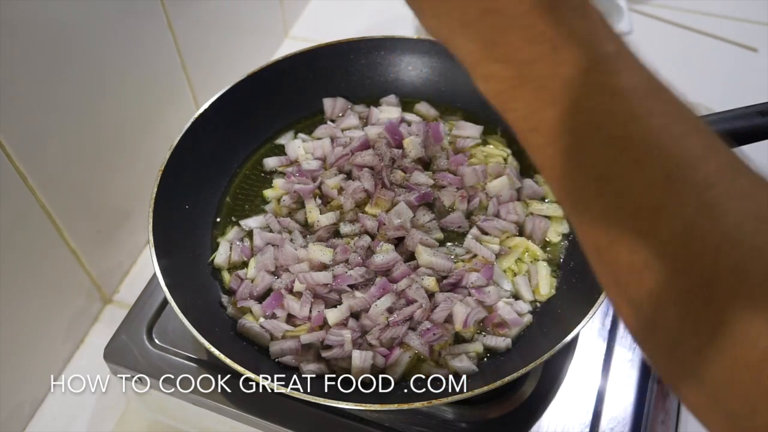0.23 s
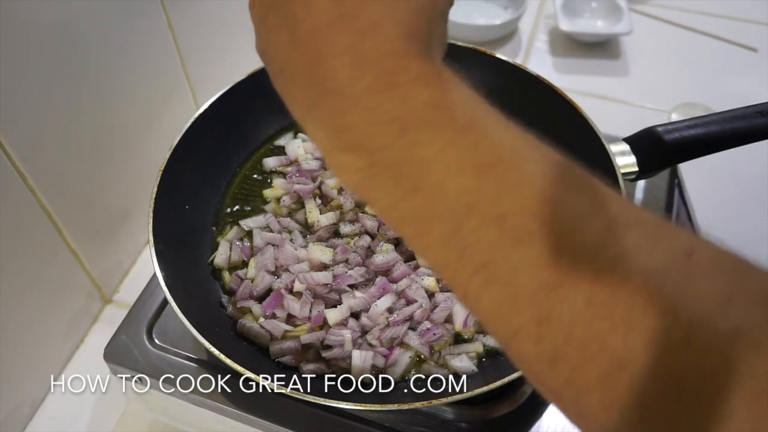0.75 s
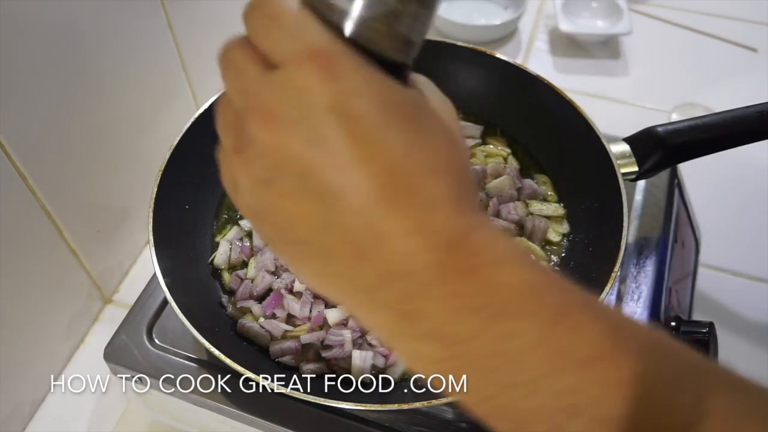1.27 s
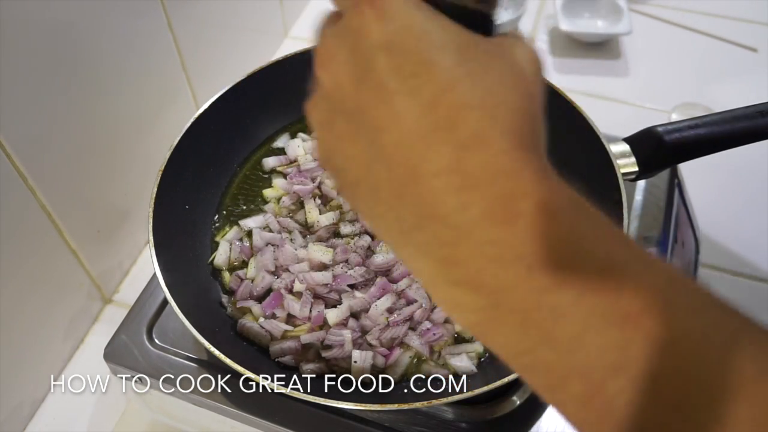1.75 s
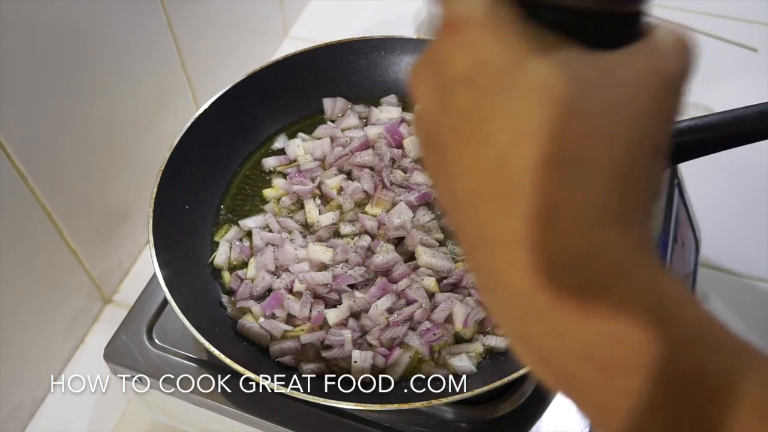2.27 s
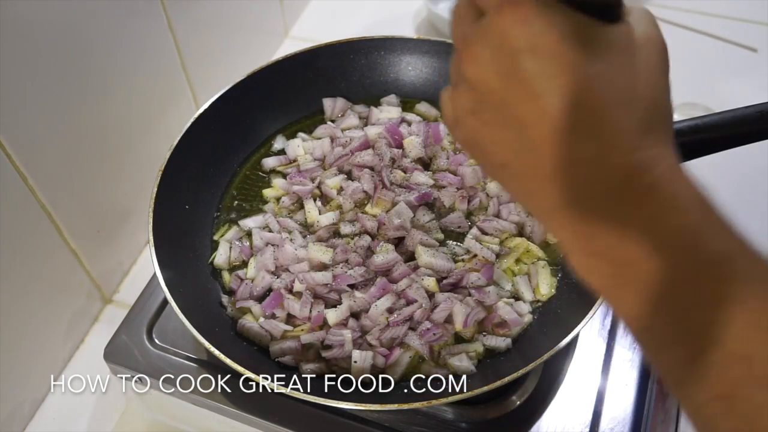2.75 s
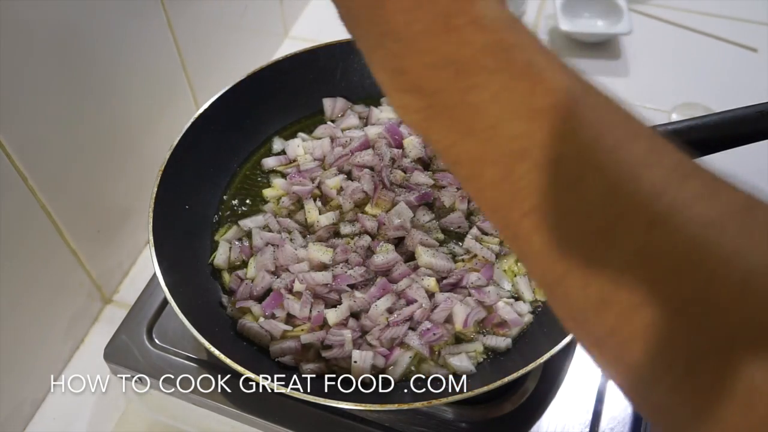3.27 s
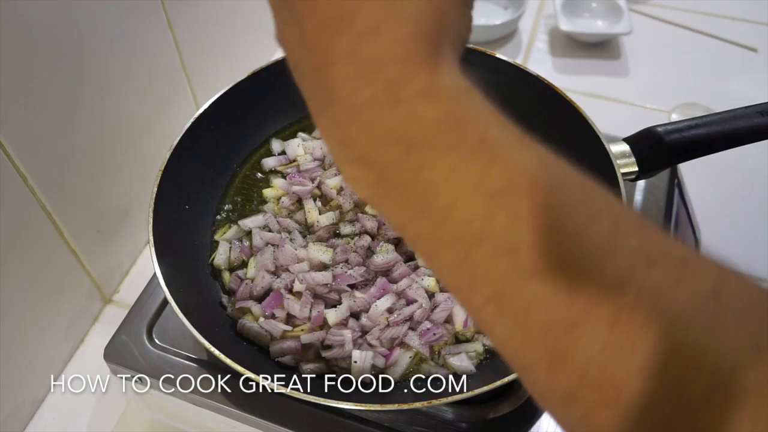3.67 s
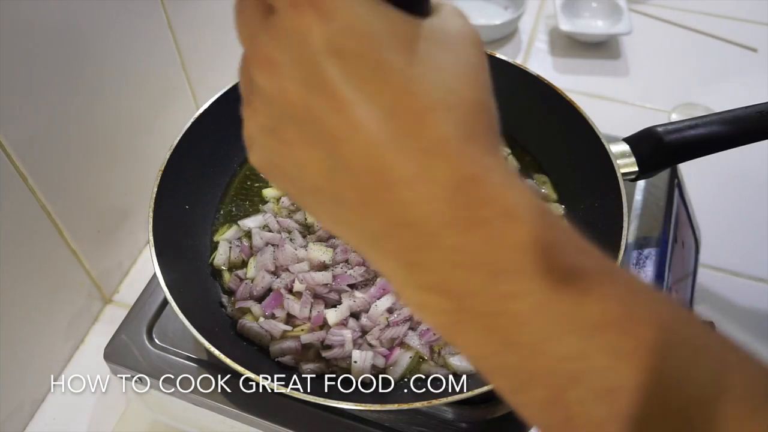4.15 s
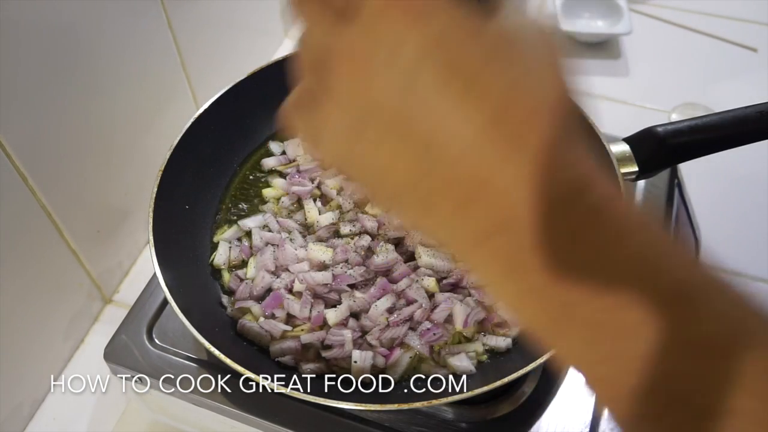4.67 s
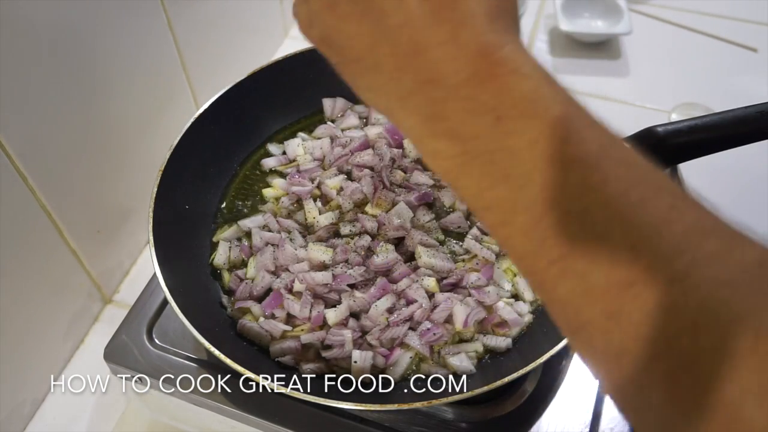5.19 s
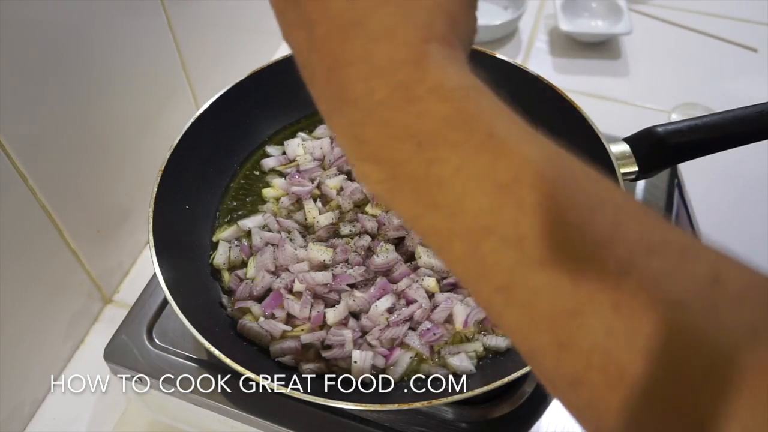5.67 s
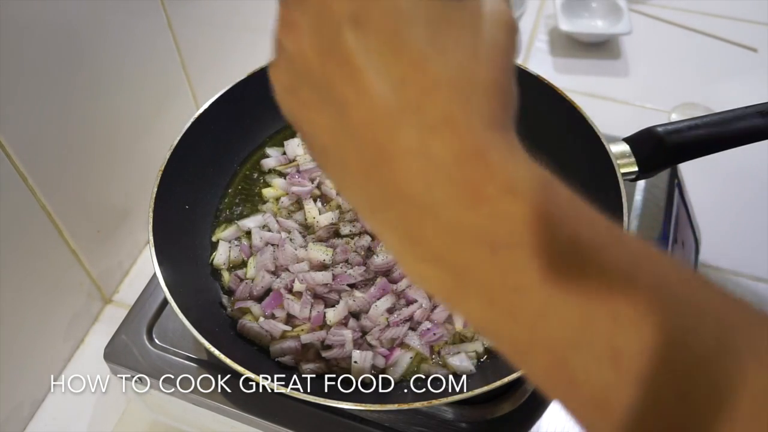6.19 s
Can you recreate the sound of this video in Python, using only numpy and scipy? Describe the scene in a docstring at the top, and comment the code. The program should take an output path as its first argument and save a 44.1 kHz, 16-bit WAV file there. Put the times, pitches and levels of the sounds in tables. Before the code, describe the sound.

Rhythmic hand grinding of peppercorns, heard close in stereo and slightly left, with a very short hard-room echo. Rough crackling crunches alternate with brief gaps filled by sandy trickling; single corns pop sharply on top. A few muffled thumps of hand on mill, a quiet hiss of frying oil, and deep steady room rumble lie below. A loose, rattly, lighter passage interrupts the pattern late, before stronger grinding returns.

```python
"""In a tiled kitchen, a hand pepper mill is twisted three to four times a second above a pan of frying onions.
Each twist crushes corns between the burrs: clumped impulses and noise ring the modes of the mill's body.
Single corns snap, and loose corns and grounds rustle brightly as bunched ticks of noise.
The hand knocks softly on the mill, the oil fizzes underneath, and a rumble and low hum fill the room."""
import sys
import numpy as np
from scipy import signal
from scipy.fft import rfft, irfft, next_fast_len
from scipy.io import wavfile
from scipy.ndimage import uniform_filter1d

SR = 44100
rng = np.random.default_rng(int(sys.argv[2]) if len(sys.argv) > 2 else 0)


def generate_wav(sig):
    """Save sig (samples, or channels by samples) to the path in sys.argv[1] as 16-bit PCM at SR."""
    pcm = np.round(np.clip(np.atleast_2d(sig).T, -1, 1) * 32767).astype(np.int16)
    wavfile.write(sys.argv[1], SR, pcm)


N = 283563  # length in samples, about 6.43 s
CONTROL_STEP = 64  # samples between the points of a surge's gain curve


def gain_of(db):
    """Turns decibels into an amplitude factor."""
    return 10 ** (np.asarray(db) / 20)


def evened(x):
    """Scales a sound to rms 1."""
    return x / np.sqrt(np.mean(x ** 2) + 1e-20)


def read(points, hz):
    """Reads a frequency table, interpolating along log frequency."""
    f, value = np.transpose(points)
    return np.interp(np.log(hz + 1), np.log(f + 1), value)


def curve(rows):
    """Draws straight lines between timed points, one value a sample."""
    s, value = np.transpose(rows)
    return np.interp(np.arange(N) / SR, s, value)


def add(mix, start_s, sound):
    """Lays a sound into the mix, cut off at the end."""
    part = mix[..., round(start_s * SR):][..., :sound.shape[-1]]
    part += sound[..., :part.shape[-1]]


def drift(shape, size):
    """Slow random wander of rms 1: noise averaged twice over size samples."""
    once = uniform_filter1d(rng.standard_normal(shape), size)
    return evened(uniform_filter1d(once, size))


def clicks(length, per_s, spread_db):
    """Random impulses of either sign; a few are large."""
    size = gain_of(spread_db * np.minimum(rng.exponential(1, length), 3))
    sign = rng.choice([-1., 1.], length)
    happens = rng.random(length) < per_s / SR
    return evened(size * sign * happens)


def coloured(x, points):
    """Filters x by a spectrum table and scales it to rms 1."""
    size = next_fast_len(N)
    hz = np.fft.rfftfreq(size, 1 / SR)
    return evened(irfft(rfft(x, size) * gain_of(read(points, hz)))[..., :N])


def swing(x, hz, width):
    """One damped mode as a turning complex pointer; its real part has about gain 1 at the centre."""
    r = np.exp(-np.pi * width / SR)
    return 2 * signal.lfilter([1 - r], [1, -r * np.exp(2j * np.pi * hz / SR)], x)


def ring(x, hz, width):
    """The audible part of one damped mode."""
    return swing(x, hz, width).real


def surges(rows, rise_db, sag_db_per_s, let_go_db, release_db_per_s, let_go_s=0.027):
    """Each row swells, sags while it holds, drops quickly and dies away; one gain curve a row."""
    start, rise, hold, level_db = np.transpose(rows)[:4, :, None]
    t = np.arange(0, N, CONTROL_STEP) / SR - start
    after = np.maximum(t - rise - hold, 0)
    swell = rise_db * np.minimum(t / rise - 1, 0)
    sag = sag_db_per_s * np.clip(t - rise, 0, hold)
    let_go = let_go_db * np.minimum(after / let_go_s, 1)
    release = release_db_per_s * after
    return gain_of(level_db + swell - sag - let_go - release) * (t >= 0)


def total(gains):
    """Power sum of the surges, brought up to the sample rate."""
    summed = np.sqrt((gains ** 2).sum(0))
    return np.interp(np.arange(N) / CONTROL_STEP, np.arange(gains.shape[1]), summed)


# stereo image, from apart (0) to identical (1): freq_hz, likeness [ratio]
LIKENESS = [(60, 1), (180, 0.98), (550, 0.88), (1650, 0.62), (4970, 0.17), (9000, 0.17), (15000, 0.41)]


def spread(a, b):
    """Makes left and right from two sounds, most alike in the bass and wider in the treble."""
    size = next_fast_len(N)
    same = np.clip(read(LIKENESS, np.fft.rfftfreq(size, 1 / SR)), 0, 1)
    mid = np.sqrt((1 + same) / 2) * rfft(a, size)
    side = np.sqrt((1 - same) / 2) * rfft(b, size)
    return irfft([mid + side, mid - side], size)[:, :N]


# spectrum of the room's rumble, relative: freq_hz, density_db [dB per Hz]
RUMBLE_SPECTRUM = [(20, -8), (45, -3.5), (200, -7), (260, -12.5), (500, -11.5), (900, -13.5)]
# lines of the hum, relative: pitch_hz, width_hz, level_db
HUM_LINES = [(30.8, 2.4, -11), (62.3, 8.6, -10.5), (107.5, 2.9, -11), (190, 16, -12)]
# shared ride of the room and the fizz before trims, with dips: time_s, level_db
ROOM_LEVEL = [(0, -39.5), (1.6, -40.5), (1.72, -47.5), (2.3, -40.5), (4.78, -35.5), (4.86, -50.5),
              (5.15, -54), (5.33, -54), (5.4, -47.5), (5.9, -44), (6.43, -45)]


def room_rumble_and_hum():
    """Low coloured noise with a wavering hum: noise rung through narrow modes."""
    rumble = spread(*(coloured(rng.standard_normal(N), RUMBLE_SPECTRUM) for _ in range(2)))
    hum = np.zeros(N)
    for hz, width, db in HUM_LINES:
        wavering = ring(ring(rng.standard_normal(N), hz, width), hz, 3 * width)
        hum += gain_of(db) * evened(wavering)
    # the strongest line has a steady core
    hum += np.sin(2 * np.pi * HUM_LINES[1][0] * np.arange(N) / SR)
    return gain_of(curve(ROOM_LEVEL) - 1.5) * (rumble + 0.3 * hum)


# spectrum of the frying oil, relative: freq_hz, density_db [dB per Hz]
FIZZ_SPECTRUM = [(290, -17.5), (500, -22), (1210, -5.5), (1460, -9), (1670, -3.5), (9360, -1.5),
                 (13800, -0.5), (16000, -3.5)]


def oil_fizz():
    """Oil hiss roughened by small pops; it sinks less than the hum."""
    pops = signal.lfilter([1], [1, -.9], abs(clicks(N, per_s=600, spread_db=5.0)))
    roughness = 0.39 * evened(pops) + 1
    fizz = spread(*(coloured(roughness * rng.standard_normal(N), FIZZ_SPECTRUM) for _ in range(2)))
    return gain_of(0.44 * curve(ROOM_LEVEL) - 12.5) * fizz


# decay of the kitchen's echo: freq_hz, t60_s
ECHO_DECAY = [(500, 0.15), (2000, 0.13), (8000, 0.074)]


def kitchen(x):
    """Echo of the kitchen: sparse taps of random sign, each band dying at its own speed."""
    length, gap = SR // 2, 20
    taps = np.zeros((2, length))
    # one tap at a random place in every gap
    at = np.arange(150, length - gap, gap) + rng.integers(0, gap, (2, (length - 151) // gap))
    np.put_along_axis(taps, at, rng.choice([-1., 1.], at.shape), 1)
    hz, t, bands = signal.stft(taps, SR, nperseg=256)
    decay = gain_of(-60 * t / read(ECHO_DECAY, hz)[:, None])
    tail = signal.istft(bands * decay, SR, nperseg=256)[1]
    return signal.fftconvolve(x, tail / np.linalg.norm(tail[0]), axes=1)[:, :N]


# soft knocks of the hand on the mill: start_s, level_db, pitch_hz, t60_s
HAND_KNOCKS = [(1.127, -38, 260, 0.077), (1.155, -32.5, 184, 0.094), (1.235, -33.5, 169, .07),
               (1.327, -39, 324, 0.13), (1.489, -34.5, 190, 0.056), (1.586, -29.5, 173, 0.057),
               (1.958, -33.5, 184, 0.077), (2.247, -39, 124, .07), (5.75, -39.5, 218, 0.031),
               (5.951, -21, 343, 0.012)]


def knocks():
    """Dull thumps: one low damped mode and a short puff of noise around 340 Hz."""
    out, t = np.zeros(N), np.arange(4000) / SR
    for start_s, db, hz, t60 in HAND_KNOCKS:
        noise = rng.standard_normal(len(t))
        puff = evened(ring(ring(noise, 340, 230), 340, 230)) * gain_of(-35 * t / t60)
        mode = np.sin(2 * np.pi * hz * t) * gain_of(-60 * t / t60)
        onset = np.minimum(t / 0.0033, 1)
        add(out, start_s, gain_of(db) * (mode + 0.47 * puff) * onset)
    return out


# grain of the rustle, relative: freq_hz, density_db [dB per Hz]
GRIT_SPECTRUM = [(530, -42), (1000, -22), (1500, -22), (2020, -9), (5000, -4), (8550, -2), (13000, -4.5),
                 (15800, -11)]
# bursts as corns slide and grounds fall: start_s, rise_s, hold_s, level_db
SLIDE_BURSTS = [(0.135, 0.039, 0.034, -19), (0.232, .02, 0.066, -25), (0.474, 0.0029, 0.16, -21),
                (0.65, 0.019, 0.36, -24.5), (0.937, 0.004, 0.033, -24.5), (1.07, 0.023, 0.023, -33),
                (1.15, 0.024, 0.006, -20.5), (1.235, 0.017, 0.11, -21.5), (1.585, 0.018, 0.077, -21),
                (1.74, 0.039, 0.033, -19), (1.975, 0.031, 0.041, -21.5), (2.12, 0.0079, 0.052, -22),
                (2.27, 0.03, 0.027, -21.5), (2.396, 0.012, 0.14, -23), (2.57, 0.016, 0.028, -25.5),
                (2.668, 0.018, 0.16, -24), (3.04, 0.024, 0.056, -23.5), (3.27, 0.07, 0.081, -27.5),
                (3.44, 0.0071, 0.098, -24), (3.77, 0.048, 0.082, -20), (4.07, 0.068, 0.099, -24),
                (4.505, 0.041, 0.062, -19), (4.75, 0.019, 0.017, -23), (4.795, 0.0078, 0.011, -15.5),
                (4.84, 0.012, 0.0099, -23), (4.88, 0.012, 0.013, -18), (4.94, 0.016, 0.043, -19.5),
                (5.035, 0.016, 0.017, -20), (5.1, 0.035, 0.041, -23.5), (5.26, 0.021, 0.025, -26),
                (5.46, 0.059, 0.0093, -20.5), (5.72, 0.023, 0.021, -27.5), (5.85, 0.012, 0.017, -27.5),
                (5.93, 0.016, 0.0076, -22.5), (5.995, 0.019, 0.023, -27.5), (6.24, 0.023, 0.069, -25)]
# steady rustle under the bursts: time_s, level_db
TRICKLE_LEVEL = [(0, -24), (.12, -44), (.35, -29), (1.45, -25.5), (1.9, -31), (3, -27), (3.65, -29),
                 (4.35, -30), (5.2, -28), (5.4, -46), (5.65, -31), (6.2, -60), (6.43, -24.5)]


def rustle():
    """Thousands of tiny dry ticks, bunched as the corns slide; small and large grains bunch apart."""
    out, tick = np.zeros((2, N)), np.hanning(40)
    # bunching shared by every band
    wide = signal.oaconvolve(abs(clicks(N, per_s=360, spread_db=0.5)), tick, "same")
    for band_hz in [(600, 4000), (4000, 7000), (7000, 11000), (11000, 21000)]:
        narrow = signal.oaconvolve(abs(clicks(N, per_s=140, spread_db=1.5)), tick, "same")
        ticks = 0.8 * evened(wide) + 0.35 * evened(narrow) + 1.3
        pair = [coloured(ticks * rng.standard_normal(N), GRIT_SPECTRUM) for _ in range(2)]
        band = signal.butter(2, band_hz, "band", fs=SR, output="sos")
        out += gain_of(2.17 * drift(N, size=500)) * signal.sosfilt(band, spread(*pair))
    bursts = total(surges(SLIDE_BURSTS, rise_db=12.5, sag_db_per_s=3.5, let_go_db=3.5, release_db_per_s=132))
    flicker = gain_of(0.64 * drift(N, size=300))
    return evened(out * flicker) * np.hypot(bursts, gain_of(curve(TRICKLE_LEVEL)))


# modes of the mill's body, relative, played by snaps and grinding: pitch_hz, width_hz, level_db
BODY_MODES = [(720, 110, -10.5), (852.7, 160, -2.5), (1091.6, 255, -13), (1422, 390, 1.5), (1614, 433, 5.5),
              (1910, 427, 4.5), (2162, 300, 5), (2710, 404, -1), (3760, 283, 7.5), (4970, 3080, -11)]
# single corns that snap, peaks before the high-pass: start_s, ring_db, pitch_hz [strongest], tick_db
CORN_SNAPS = [(0.234, -15, 2030, -12), (0.282, -10, 1820, -23), (0.29, -12, 2510, -11),
              (0.481, -28, 2460, -5), (0.613, -8.5, 2000, -22), (0.626, -10, 1950, -22),
              (0.691, -12, 2160, -9), (0.9405, -7, 3700, -15), (0.949, -17, 3900, -18),
              (1.1175, -35, 2560, -9), (1.1882, -12, 2530, -22), (1.325, -13, 2000, -11),
              (1.339, -9, 2000, -9), (1.596, -13, 3830, -20), (1.714, -9, 3670, -20),
              (1.8435, -20, 3630, -10), (1.9265, -25, 3570, -10), (2.0912, -11, 2280, -9.5),
              (2.2814, -33, 3640, -12), (2.341, -16, 2630, -10), (2.449, -7, 2830, -9),
              (2.506, -33, 2000, -12), (2.606, -19, 2700, -8), (2.6779, -23, 3300, -5),
              (2.7867, -11, 2680, -24), (2.82, -9, 2700, -21), (2.842, -11.5, 2660, -14),
              (2.875, -29, 3700, -9), (2.8807, -8.5, 2960, -28), (3.136, -16, 1510, -16),
              (3.237, -6.5, 3270, -20), (3.3137, -29, 4320, -8), (3.377, -18, 3160, -17),
              (3.4618, -13, 2400, -9.5), (3.504, -13.5, 2000, -20), (3.579, -7.5, 2160, -16),
              (3.711, -19.5, 2300, -24), (3.899, -8, 1660, -15), (3.922, -8, 2460, -16),
              (4.1863, -11, 1600, -27), (4.1985, -11, 3300, -18), (4.249, -14, 1970, -8.5),
              (4.258, -25, 1890, -12), (4.2745, -16, 4220, -24), (4.49, -29, 4020, -8),
              (4.692, -33, 4410, -13), (4.853, -21.5, 1270, -6), (5.1285, -11.5, 3680, -13),
              (5.1389, -13, 1850, -22), (5.497, -9.5, 3900, -24), (5.526, -12, 1060, -11.5),
              (5.6033, -11, 2690, -9.5), (5.607, -17, 3380, -12), (5.922, -22, 1960, -15),
              (5.9545, -14.5, 4200, -18), (5.9635, -10, 2460, -11), (5.986, -20, 915, -30),
              (6.0163, -17, 4340, -15), (6.2235, -41, 2240, -12.5), (6.288, -15, 3900, -11),
              (6.39, -13, 2100, -17)]


def snaps():
    """A snap is a short tick of dry noise while the modes of the body near its pitch ring out."""
    out, t = np.zeros(N), np.arange(600) / SR
    treble = signal.butter(2, [4500, 13000], "band", fs=SR, output="sos")
    for start_s, ring_db, pitch_hz, tick_db in CORN_SNAPS:
        burst = rng.standard_normal(len(t)) * gain_of(-60 * t / 0.0073) * np.minimum(t / 0.0011, 1)
        tick = signal.sosfilt(treble, burst)
        body = gain_of(-60 * t / 0.01) * np.sin(2 * np.pi * pitch_hz * t)
        for hz, width, db in BODY_MODES[1:-1]:
            # modes ring less the more octaves they lie from the snap's pitch
            level = gain_of(db - 11.5 * abs(np.log2(hz / pitch_hz)))
            phase = 6 * rng.random()
            body += level * np.exp(-5 * width * t) * np.sin(2 * np.pi * hz * t + phase)
        body *= np.minimum(t / 0.00047, 1)
        dry_tick = gain_of(tick_db) * tick / abs(tick).max()
        add(out, start_s, dry_tick + gain_of(ring_db) * body / abs(body).max())
    return signal.sosfilt(signal.butter(2, 600, "high", fs=SR, output="sos"), out)


# twists of the mill: start_s, rise_s, hold_s, force_db, upper_db [upper modes over the lowest three]
MILL_TWISTS = [(0.0, 0.0013, 0.011, -39, 10), (0.236, 0.008, 0.12, -33.5, 7.5),
               (0.465, 0.0093, 0.033, -47.5, 14), (0.594, 0.0056, 0.1, -33.5, 10),
               (0.938, 0.0054, 0.081, -32, 8), (1.285, 0.035, 0.029, -31.5, 9.5),
               (1.622, 0.017, 0.14, -34.5, 3), (1.998, 0.019, 0.026, -34, 10.5),
               (2.394, 0.013, 0.086, -33, 7.5), (2.733, 0.014, 0.1, -32.5, 7.5),
               (3.093, 0.026, 0.011, -30.5, 10.5), (3.452, 0.02, 0.048, -30.5, 8),
               (3.806, 0.012, 0.096, -35.5, 10.5), (4.184, 0.0026, 0.061, -31, 8),
               (4.524, 0.023, 0.029, -33, 11), (4.72, 0.025, 0.027, -46, 11),
               (4.843, .01, 0.039, -46.5, -7), (4.99, 0.0071, 0.035, -46, 7),
               (5.119, 0.011, 0.036, -42, 12.5), (5.472, 0.027, 0.031, -30.5, 4.5),
               (5.858, 0.01, 0.044, -42, 13), (5.905, 0.026, 0.055, -39.5, 14),
               (6.273, 0.0063, 0.24, -38, 8.5)]


def grinding():
    """Clumped fractures between the burrs ring the body; each twist sets its own share of upper modes."""
    force = surges(MILL_TWISTS, rise_db=16, sag_db_per_s=19.5, let_go_db=3.5, release_db_per_s=96)
    low = total(force)
    high = total(force * gain_of(MILL_TWISTS)[:, -1:])
    cracks = clicks(N, per_s=350, spread_db=2)
    # corns break at changing places, so each mode is driven now more, now less
    shape = (len(BODY_MODES), N)
    reach = gain_of(1.55 * drift(shape, size=300) + 1.0 * drift(shape, size=5000))
    # the lowest modes wander slowly and randomly in pitch
    bend = 0.035 * drift((3, N), size=4000)
    turns = [np.exp(2j * np.pi * np.cumsum(mode[0] * bend[k]) / SR) for k, mode in enumerate(BODY_MODES[:3])]
    pair = []
    for _ in range(2):
        # each fracture is a sharp blow and a short crumble of noise, over a steady scrape
        crumble = signal.oaconvolve(abs(cracks), np.hanning(70), "same") * rng.standard_normal(N)
        scrape = rng.standard_normal(N)
        drive = 0.6 * cracks + 0.6 * evened(crumble) + 0.27 * scrape
        modes = []
        for k, (hz, width, db) in enumerate(BODY_MODES):
            rung = swing(ring(reach[k] * drive, hz, 4 * width), hz, width)
            modes.append((-1) ** k * gain_of(db) * rung)
        lowest = sum(mode * turn for mode, turn in zip(modes, turns)).real
        upper = sum(modes[3:]).real
        pair.append(low * evened(lowest) + high * evened(upper))
    # keeps the grinding above about 580 Hz
    high_pass = signal.butter(4, 580, "high", fs=SR, output="sos")
    return signal.sosfilt(high_pass, spread(*pair))


def panned(db):
    """Left and right gains for a left-over-right level in dB."""
    return gain_of(np.array([db / 2, -db / 2]))


# where the mill is held: time_s, left_over_right_db
MILL_PLACE = [(0, -3), (.9, -1.5), (1.7, -2.5), (3, -3), (3.5, -1.5), (4.3, -1), (4.9, -2), (5.5, -1),
              (6.43, -1.5)]


def scene():
    """The mill and its echo, panned to where it is held, over the knocks, the pan and the room."""
    mill = grinding() + rustle() + snaps()
    echo = gain_of(-8.5) * spread(*kitchen(mill))
    placed = (mill + echo) * panned(curve(MILL_PLACE))
    return placed + knocks() + oil_fizz() + room_rumble_and_hum()


def record(dry):
    """Rounds off the loudest peaks, then cuts the treble above 16 kHz."""
    rounded = .75 * np.tanh(dry / .75)
    treble_cut = signal.firwin(1023, 16000, window=("kaiser", 9), fs=SR)
    return signal.oaconvolve(rounded, treble_cut[None], "same")


dry = scene()
out = record(dry)
generate_wav(out)
```